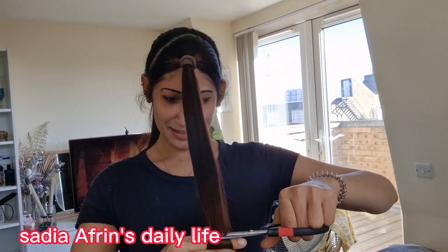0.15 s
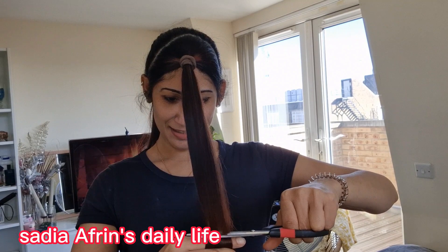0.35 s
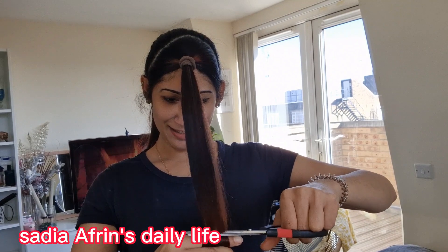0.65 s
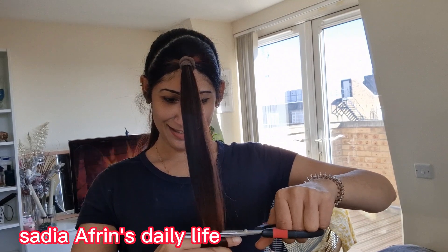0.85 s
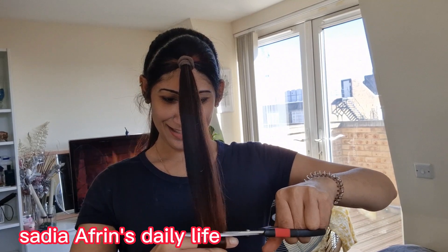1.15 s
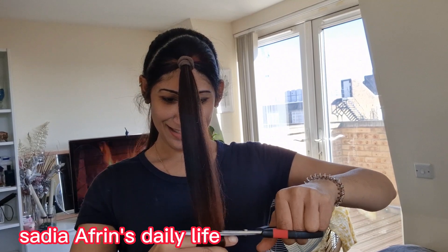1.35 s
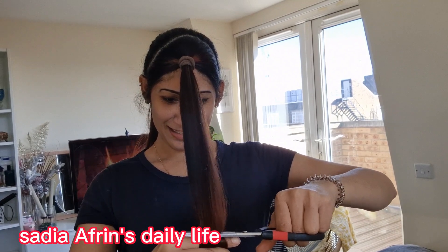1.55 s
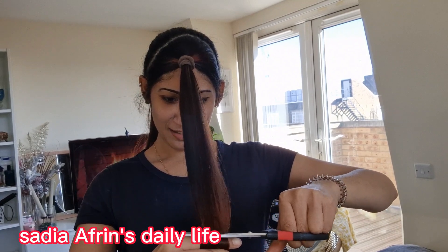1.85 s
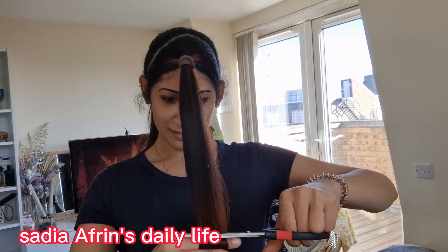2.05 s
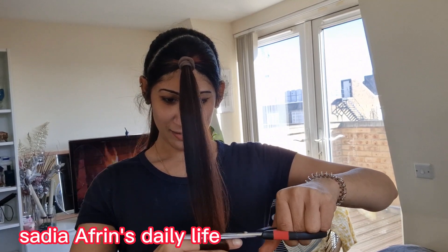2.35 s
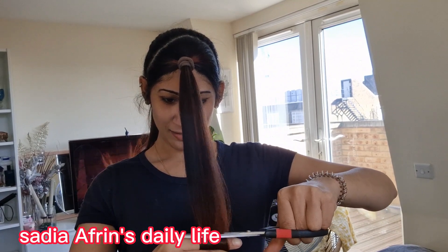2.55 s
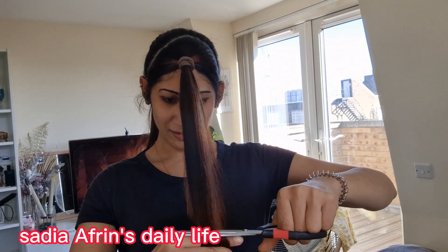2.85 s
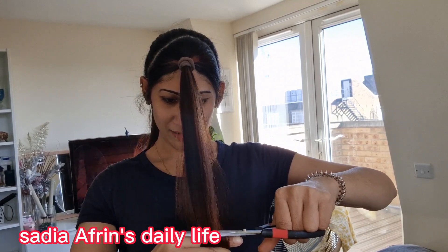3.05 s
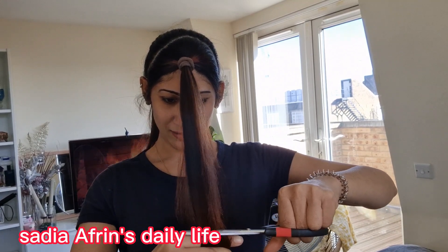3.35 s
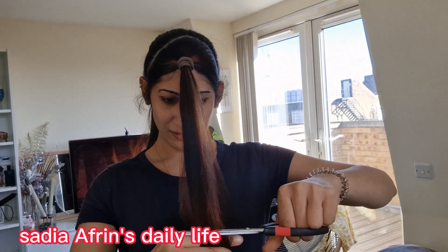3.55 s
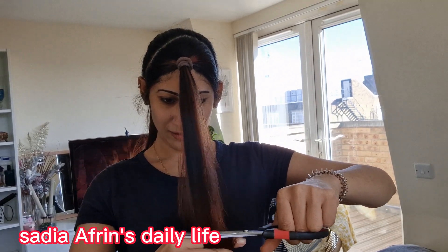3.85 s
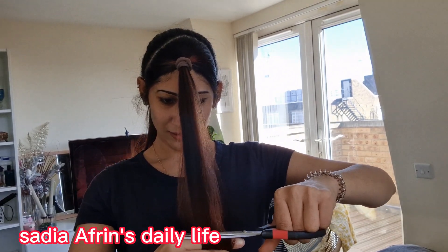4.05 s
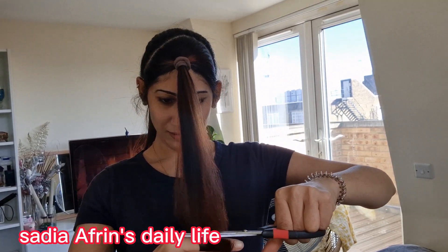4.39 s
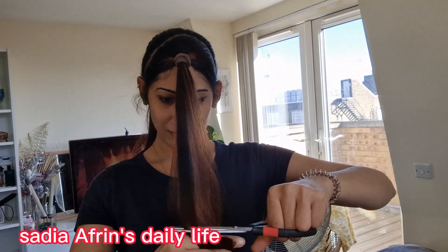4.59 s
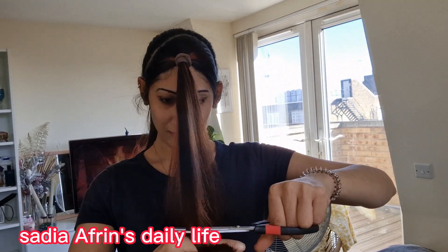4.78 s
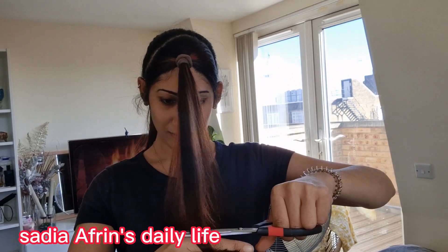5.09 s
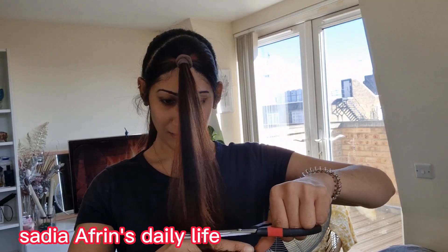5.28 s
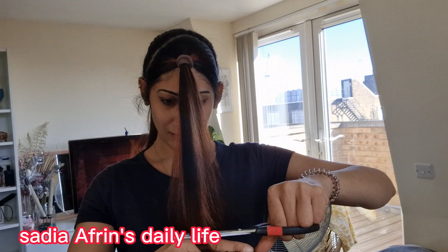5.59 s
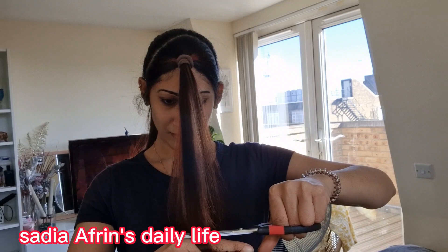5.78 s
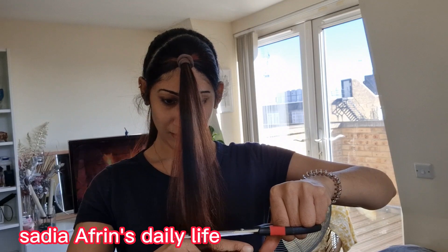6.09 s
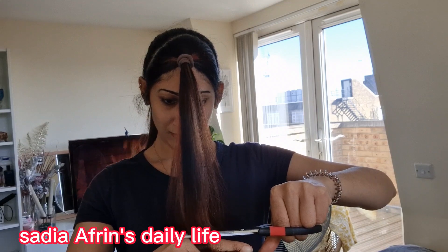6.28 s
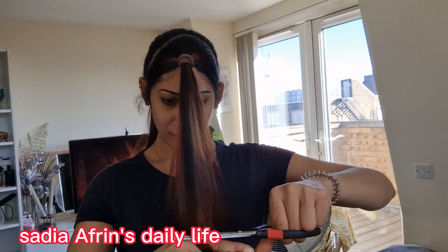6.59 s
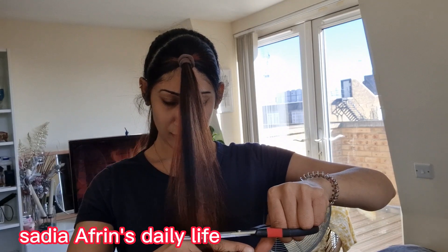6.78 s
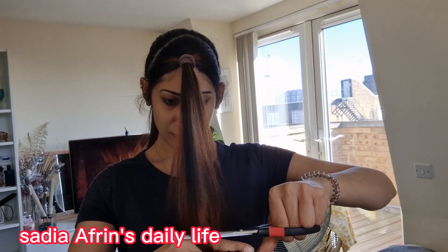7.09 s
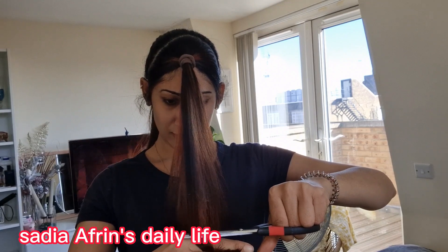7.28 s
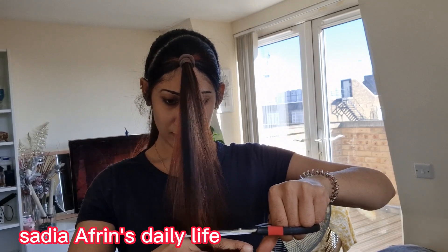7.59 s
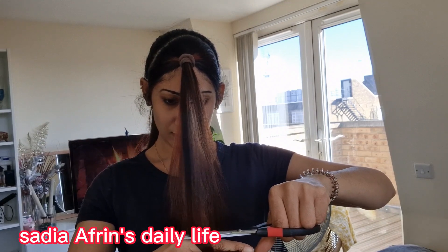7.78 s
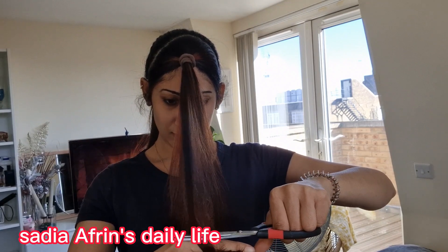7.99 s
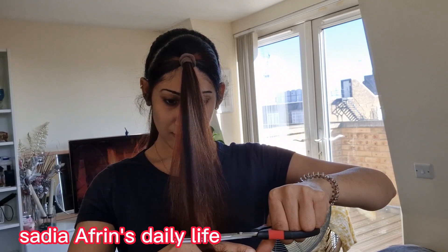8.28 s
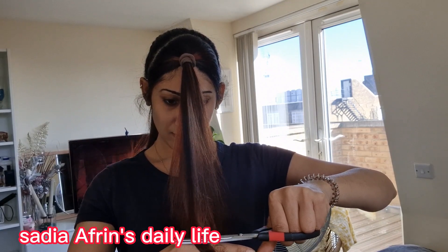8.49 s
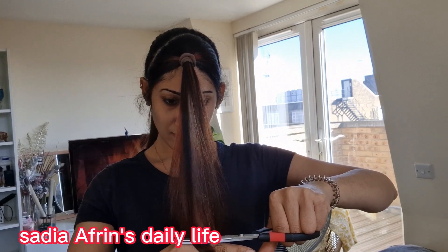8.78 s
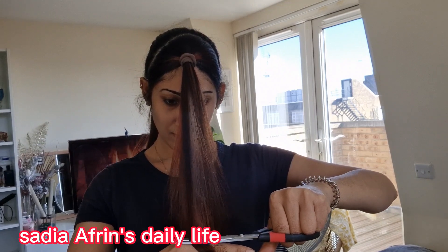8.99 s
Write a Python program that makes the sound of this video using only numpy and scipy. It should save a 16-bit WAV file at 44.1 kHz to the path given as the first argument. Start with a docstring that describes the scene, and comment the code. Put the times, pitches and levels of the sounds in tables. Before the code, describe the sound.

A quiet living room with a low swelling mains hum, rumble and thin hiss. Near the stereo microphone, scissors crunch through thick hair: six brisk strokes, each gritty and bright with a small steel ring, and soft metallic sliding as the blades part. After a pause come three slower squeezes, where small bunches of hair pop and crackle separately. A faint hand bump sounds early on.

```python
"""Scissors cut a thick lock of hair close to a phone in a quiet room with hum, rumble and hiss throughout.
First six quick crunchy strokes, the blades sliding softly open in between; then three slow, crackling bites.
Each severed hair is a tiny noise burst that rings the steel blades; thick bundles snap in longer bursts.
Two soft hand bumps are decaying sines. The room adds quick reflections and a short tail."""
import sys
import numpy as np
from scipy import signal
from scipy.fft import rfft, irfft
from scipy.io import wavfile

SR = 44100
rng = np.random.default_rng(int(sys.argv[2]) if len(sys.argv) > 2 else 0)


def file_out(sig):
    """Save sig as 16-bit WAV at sys.argv[1]."""
    # one column per channel
    cols = np.atleast_2d(sig).T
    # limit, then scale
    lim = np.clip(cols, -1, 1)
    pcm = np.round(lim * 32767).astype(np.int16)
    wavfile.write(sys.argv[1], SR, pcm)


N = 403074

# room tone, spectral shapes: (freq_hz, relative_density_db)
RUMBLE_SHAPE = [(12, -53), (20, -2.5), (53, -0.5), (75, -9.5), (102, -4.5), (115, -7), (125, -12.5),
                (151, -11), (202, -10.5), (236, -17), (452, -26), (1200, -38.5), (1560, -61), (2640, -120)]
HISS_SHAPE = [(600, -14.5), (1100, -4.5), (2300, -8), (4600, -10), (5800, -12), (6700, -6.5), (7500, -11),
              (8300, -16), (9900, -14), (11000, -19.5), (15500, -16)]
# room tone at the two ports: (freq_hz, left_right_correlation)
AIR_CORRELATION = [(40, 0.65), (200, 0.68), (400, 0.12), (900, 0.093), (3000, 0.018)]
# room tone: (freq_hz, left_minus_right_db)
AIR_BALANCE = [(100, 1.5), (3000, 1.5), (4500, 4.5), (5400, 5), (5900, 0), (6500, 9.5), (7700, 11),
               (8800, 3), (9600, -3), (11000, -1), (15000, 3)]
RUMBLE_RMS_DB, HISS_RMS_DB = -49, -68  # of the left-right mean; the rumble drifts around its level

# hum partials: (multiple_of_fundamental, centre_db)
HUM_PARTIALS = [(2, -56.5), (3.24, -63.5), (4, -62.5), (8, -79.5)]
# swells of the hum fundamental, before HUM_TRIM_DB: (peak_time_s, time_to_1_over_e_s, level_db)
HUM_SWELLS = [(2.3, 0.48, -39.5), (4.2, 0.5, -45), (7.05, 0.54, -42), (8.844, 0.25, -44)]
MAINS_HZ = 49.57
HUM_FLOOR_DB, HUM_TRIM_DB = -62, -2  # fundamental between swells; trim of floor and swells

# hand bumps: (start_s, envelope_peak_db, pitch_hz)
HAND_BUMPS = [(0.784, -43, 228), (2.862, -62, 704)]

# blades parting: (fastest_s, drive_db)
OPENINGS = [(0.035, -65), (0.84, -62.5), (1.54, -57.5), (2.23, -62), (2.93, -65), (3.89, -61.5)]
OPENING_HALF_S = 0.044  # to 1/e, either side

# quick strokes; the two offsets add to the body and tip settings:
# (start_s, length_s, rise_s, grip_drive_db, end_drive_db, body_offset_db, rasp_offset_db)
QUICK_STROKES = [ (0.284, 0.041, 0.004, -59.5, -56.5, -1, -10), (0.329, 0.25, 0.0063, -48, -53.5, -1.5, -6),
                 (1.094, 0.19, 0.039, -48.5, -41.5, -3.5, -3), (1.781, 0.16, 0.091, -41.5, -42, -7.5, 0),
                 (2.479, 0.18, 0.077, -40.5, -42.5, -6.5, -0.5), (3.158, 0.23, 0.086, -42, -48, -5.5, 0),
                 (4.176, 0.27, 0.04, -54.5, -41.5, -4, -1), ]
# pushes of the slow bites: (start_s, length_s, rise_s, grip_drive_db, end_drive_db, treble_gain_db)
SLOW_PUSHES = [ (5.645, 0.066, 0.022, -56, -53.5, -3), (5.754, 0.3, 0.004, -52.5, -59, -3),
               (6.072, 0.24, 0.01, -65.5, -61, -2), (7.02, 0.15, 0.044, -51, -57, 1.5),
               (7.172, 0.06, 0.005, -59, -57.5, 0), (7.266, 0.2, 0.03, -77.5, -63.5, -1),
               (7.496, 0.084, 0.024, -54.5, -57, -0.5), (8.463, 0.11, 0.0057, -66, -63.5, 2),
               (8.586, 0.25, 0.025, -54, -56.5, 1.5), (8.895, 0.027, 0.0092, -59, -58.5, 3.5),
               (8.968, 0.15, 0.005, -65.5, -53, 3.5), ]
# thick bundles giving way, before the bundle trim: (start_s, drive_peak_db)
BUNDLE_SNAPS = [(0.292, -49), (0.3357, -39.5), (0.4202, -36), (0.5541, -37), (1.109, -42), (1.809, -42.5),
                (1.953, -23), (2.5006, -50), (2.648, -32), (4.24, -31.5), (5.658, -43.5), (5.7669, -34),
                (5.8054, -36.5), (5.9879, -38), (6.028, -36.5), (6.1474, -43), (7.0554, -33),
                (7.0738, -35.5), (7.1764, -35.5), (7.217, -38), (7.3956, -47), (7.509, -44), (7.559, -35),
                (7.5907, -38), (8.467, -42), (8.5946, -36), (8.6364, -28.5), (8.6836, -30.5),
                (8.7165, -27.5), (8.737, -30), (8.776, -37.5), (8.802, -32), (8.9767, -37), (9.0473, -39)]
RELEASE_DB_PER_S = 350  # the crunch dies as the blades leave the hair
RUN_OUT_S = 0.045  # full crunch end to blades shut
BODY_ARCH_DB, BODY_SKEW = 4.5, 1.15  # body thinner at both ends of a cut, fullest past its middle
TIP_HZ, TIP_WIDTH_HZ = 3550, 2100  # this band grows from pivot to tips
# band gain, before the rasp offset: (pivot_db, tips_db)
TIP_GAIN_DB = (-6, 3)
BRIGHT_HZ = 9200  # the treble of a push lies above this
SMALL_PER_S, SMALL_DB, SMALL_SPREAD_DB = 25, 6.5, 4  # lesser bundles: rate, mean peak over force, spread

# broad colour of each kind of blade work: (freq_hz, gain_db)
CUT_COLOUR = [(300, -13.5), (600, -13), (900, -19), (1400, -12), (2150, -3), (2600, -18), (3300, 1.5),
              (4450, 1.5), (4850, -13.5), (5300, -3.5), (6500, -1.5), (7300, -2.5), (8200, -2.5),
              (9500, -4.5), (13000, -4), (15000, -8.5)]
BITE_COLOUR = [(1300, -22.5), (2150, -5), (2750, -17.5), (3450, 1), (4450, 1), (4950, -6.5), (5450, 3),
               (6200, -10), (7400, 1.5), (8350, -7.5), (10150, 0), (11000, -10), (11800, -4), (15000, -4)]
SLIDE_COLOUR = [(700, -8.5), (2000, -8.5), (2900, -14), (4000, -4.5), (4900, -3), (5700, 0.5), (6200, -11),
                (7400, -2.5), (8300, -5.5), (11000, -13.5), (12000, -7), (15000, -15)]
# steel resonances: (freq_hz, width_hz, relative_peak_db)
BLADE_MODES = [(2247, 37, 7.5), (3550, 190, -2), (4030, 28, -14), (5580, 52, 5), (5840, 43, -3),
               (6340, 37, -4), (6720, 130, 3), (6850, 40, 5), (7240, 210, 1), (7470, 42, 4.5),
               (7760, 55, 1.5), (8830, 45, 1.5), (9160, 310, 0.5), (11700, 74, 1)]

# the two microphone ports, for the scissors: (freq_hz, left_minus_right_db)
PORT_BALANCE = [(1000, 4), (3100, 4), (3700, 6.5), (4400, 7), (5000, 25), (5500, 1), (6200, 3), (7400, 5.5),
                (8600, 11.5), (9700, -2.5), (11600, 9.5), (13500, 7), (14800, 7), (15400, 15)]
# direct sound at the ports: (freq_hz, left_lead_rad)
PORT_PHASE = [(2900, 0.5), (3800, 1), (4500, 2.5), (4900, 3), (5600, 2.7), (6500, 1), (7500, 0.8),
              (9000, 3.5), (10000, 1.5), (14000, 2)]
# room tail: (freq_hz, decay_60db_s)
ROOM_T60 = [(500, 0.35), (3000, 0.14), (8000, 0.14), (15000, 0.17)]
EDGE_HZ = 15580  # top of the sound's band


def from_db(db):
    """Decibels to amplitude gain."""
    return 10 ** (np.asarray(db) / 20)


def unit(x):
    """Scale to rms 1."""
    return x / np.sqrt(np.mean(x ** 2) + 1e-20)


def read(points, hz):
    """Straight lines on a log-frequency axis."""
    f, value = np.transpose(points)
    return np.interp(np.log(hz + 1), np.log(f + 1), value)


def ports(balance_db):
    """Left and right gains of constant total power."""
    gains = from_db([balance_db / 2, -balance_db / 2])
    return gains / np.sqrt(np.mean(gains ** 2, 0))


def wander(rate_hz):
    """Random drift of rms 1: noise under a Gaussian low-pass."""
    hz = np.fft.rfftfreq(N, 1 / SR)
    spectrum = rfft(rng.standard_normal(N))
    return unit(irfft(spectrum * np.exp(-(hz / rate_hz) ** 2), N))


def swell(peak_s, half_s, db):
    """Gain with a smooth Gaussian rise and fall around one moment."""
    return from_db(db) * np.exp(-((np.arange(N) / SR - peak_s) / half_s) ** 2)


def air(shape, rms_db):
    """Room noise, more alike at both ports in the bass than in the treble."""
    hz = np.fft.rfftfreq(N, 1 / SR)
    a, b = rfft(rng.standard_normal((2, N)))
    same = np.clip(read(AIR_CORRELATION, hz), -1, 1)
    pair = np.array([a, same * a + np.sqrt(1 - same ** 2) * b])
    noise = irfft(pair * ports(read(AIR_BALANCE, hz)) * from_db(read(shape, hz)), N)
    return from_db(rms_db) * noise / np.std(noise.mean(0))


def hum(waver_rad=0.46, partial_waver_rad=0.72, flutter_db=3.0, balance_db=1.4):
    """Mains hum of an appliance: a swelling fundamental under partials that waver in level and phase."""
    turn = 2 * np.pi * MAINS_HZ * np.arange(N) / SR
    level = from_db(HUM_FLOOR_DB) + sum(swell(*row) for row in HUM_SWELLS)
    base = from_db(HUM_TRIM_DB) * level * np.sin(turn + waver_rad * wander(2.5))
    upper = np.zeros(N)
    for multiple, db in HUM_PARTIALS:
        gain = from_db(db + flutter_db * wander(3.4))
        upper += gain * np.sin(multiple * turn + partial_waver_rad * wander(4.4))
    return (base + upper) * ports(balance_db)[:, None]


def hand_bumps(peak_after_s=0.0048):
    """Soft bumps of the hands: short sines under an envelope that rises and decays."""
    t = np.arange(N) / SR
    sound = np.zeros(N)
    for start_s, db, hz in HAND_BUMPS:
        age_s = np.maximum(t - start_s, 0)
        envelope = age_s / peak_after_s * np.exp(1 - age_s / peak_after_s)
        sound += from_db(db) * envelope * np.sin(2 * np.pi * hz * age_s)
    return sound


def squeeze(start_s, length_s, rise_s, grip_db, end_db):
    """Gain of one stroke: the blades grip, work through the lock as the force shifts, and run out of hair."""
    age_s = np.arange(round((length_s + .5) * SR)) / SR
    hold_db = np.interp(age_s, [rise_s, max(length_s, rise_s)], [grip_db, end_db])
    release_db = RELEASE_DB_PER_S * np.maximum(age_s - length_s, 0)
    gain = np.minimum(age_s / rise_s, 1) * from_db(hold_db - release_db)
    return np.pad(gain, (round(start_s * SR), N))[:N]


def crackle(per_s, spread_db, rub, burst_s, clump_db, clump_hz, size=300):
    """Hairs tear in tiny noise bursts, unequal in size and in clumps, over the rub of the edges."""
    sizes = from_db(spread_db * np.minimum(rng.exponential(1, N), 3.5))
    starts = sizes ** 2 * (rng.random(N) < per_s / SR)
    age = np.arange(size) / SR / burst_s
    power = np.convolve(starts, age * np.exp(-age))[:N]
    tearing = np.sqrt(power / power.mean() + rub ** 2) * rng.standard_normal(N)
    return unit(tearing * from_db(clump_db * wander(clump_hz)))


def blades(drive, colour, ring, size=4096):
    """Minimum-phase response: broad colour of the snap with narrow steel resonances on top."""
    hz = np.fft.rfftfreq(size, 1 / SR)
    peaks = sum(from_db(db) ** 2 / (1 + (2 * (hz - f) / width) ** 2) for f, width, db in BLADE_MODES)
    log_gain = np.log(from_db(read(colour, hz)) * np.sqrt(1 + ring ** 2 * peaks))
    circle = np.concatenate([log_gain, log_gain[-2:0:-1]])
    # the Hilbert transform of log gain gives the causal phase
    response = np.fft.ifft(np.exp(np.conj(signal.hilbert(circle)))).real
    return signal.oaconvolve(drive, response / np.linalg.norm(response))[:N]


def openings():
    """Steel slides on steel as the blades part: dense fine crackle with a strong rub."""
    force = sum(swell(s, OPENING_HALF_S, db) for s, db in OPENINGS)
    grain = crackle(per_s=900, spread_db=5.5, rub=0.59, burst_s=0.0001, clump_db=-0.5, clump_hz=120)
    return blades(force * grain, SLIDE_COLOUR, ring=1.06)


def slow_crackle(force):
    """Under slow pressure the hairs part in separate little bunches."""
    grain = crackle(per_s=520, spread_db=3.5, rub=0.18, burst_s=0.0003, clump_db=2.5, clump_hz=180)
    return blades(force * grain, BITE_COLOUR, ring=0.9)


def bundles(force, trim_db=-5, peak_after_s=0.00048, size=400):
    """A bundle gives way in a noise burst about a millisecond long; small ones go at random under the force."""
    small = from_db(SMALL_DB + SMALL_SPREAD_DB * rng.standard_normal(N))
    peaks = force * small * (rng.random(N) < SMALL_PER_S / SR)
    for start_s, db in BUNDLE_SNAPS:
        peaks[round(start_s * SR)] = from_db(db)
    age = np.arange(size) / SR / peak_after_s
    drive = np.convolve(peaks, age * np.exp(1 - age))[:N] * rng.standard_normal(N)
    return from_db(trim_db) * blades(drive, BITE_COLOUR, ring=1.0)


def slow_work():
    """Each slow push drives the crackle and small bundles, beside timed snaps, and sets the brightness."""
    force = sum(squeeze(*row[:-1]) for row in SLOW_PUSHES)
    sound = slow_crackle(force) + bundles(force)
    treble_db = np.zeros(N)
    for start_s, *_, db in SLOW_PUSHES:
        treble_db[round(start_s * SR):] = db
    high_pass = signal.butter(3, BRIGHT_HZ, "high", fs=SR, output="sos")
    treble = signal.sosfiltfilt(high_pass, sound)
    return sound + treble * (from_db(treble_db) - 1)


def quick_cuts(trim_db=1.0, body_db=5, body_hz=4200, fizz_hz=10300, fizz_share=0.18):
    """Dense crunch; gains body and fizz where the blades are deepest in the lock, and rasps towards the tips."""
    force, depth_db, tip_db = np.zeros((3, N))
    for start_s, length_s, rise_s, grip_db, end_db, body_offset_db, rasp_db in QUICK_STROKES:
        force += squeeze(start_s, length_s, rise_s, grip_db, end_db)
        at = round(start_s * SR)
        closed = np.minimum(np.arange(N - at) / SR / (length_s + RUN_OUT_S), 1)  # 0 open, 1 shut
        arch_db = BODY_ARCH_DB * (1 - np.sin(np.pi * closed ** BODY_SKEW))
        depth_db[at:] = body_db + body_offset_db - arch_db
        tip_db[at:] = rasp_db + np.interp(closed, [0, 1], TIP_GAIN_DB)
    grain = crackle(per_s=1600, spread_db=4.2, rub=0.28, burst_s=0.0002, clump_db=1.57, clump_hz=130)
    crunch = blades(force * grain, CUT_COLOUR, ring=2.06)
    tips = signal.lfilter(*signal.iirpeak(TIP_HZ, TIP_HZ / TIP_WIDTH_HZ, fs=SR), crunch)
    crunch = crunch + tips * (from_db(tip_db) - 1)
    low = signal.sosfiltfilt(signal.butter(3, body_hz, fs=SR, output="sos"), crunch)
    high = signal.sosfiltfilt(signal.butter(4, fizz_hz, "high", fs=SR, output="sos"), crunch)
    body = low * (from_db(depth_db) - 1)
    fizz = high * (from_db(fizz_share * depth_db) - 1)
    return from_db(trim_db) * (crunch + body + fizz)


def room(x, near_db=-0.5, near_s=0.0045, tail_db=-2, port_hz=15300, port_width_hz=350, port_db=6, size=16384):
    """Direct sound, quick reflections from hands and chest, and a short tail, heard at two ports."""
    t, hz = np.arange(size) / SR, np.fft.rfftfreq(size, 1 / SR)
    lead = 64  # samples kept ahead of the direct sound for the phase-advanced port
    direct = np.exp(1j * np.array([[.5], [-.5]]) * read(PORT_PHASE, hz))
    near = rng.standard_normal((2, size)) * np.exp(-t / near_s)
    late_noise = rng.standard_normal((2, size)) * (t > .005)
    f, age_s, z = signal.stft(late_noise, SR, nperseg=256)
    decay = from_db(-60 * age_s / read(ROOM_T60, f)[:, None])
    tail = signal.istft(z * decay, SR, nperseg=256)[1][:, :size]
    echoes = (from_db(near_db) * unit(near) + from_db(tail_db) * unit(tail)) / np.sqrt(size)
    cavity = from_db(port_db / (1 + ((hz - port_hz) / port_width_hz) ** 2))  # the ports resonate at the very top
    response = irfft((direct + rfft(echoes)) * ports(read(PORT_BALANCE, hz)) * cavity)
    response = np.roll(response, lead, axis=1)
    return signal.oaconvolve(x[None], response, axes=1)[:, lead:lead + N]


def scene(drift_db=0.5):
    """The scissors in the room, over hum, slowly drifting rumble and steady hiss."""
    rumble = from_db(drift_db * wander(0.96)) * air(RUMBLE_SHAPE, RUMBLE_RMS_DB)
    background = rumble + air(HISS_SHAPE, HISS_RMS_DB) + hum()
    # the hands shift between quick and slow work, so each has its own reflections
    scissors = room(quick_cuts() + openings()) + room(slow_work())
    return background + hand_bumps() + scissors


def record(dry):
    """Band limit: a linear-phase low-pass leaves nothing above the edge."""
    low_pass = signal.firwin(801, EDGE_HZ, window=("kaiser", 8), fs=SR)
    return signal.oaconvolve(dry, low_pass[None], "same", axes=1)


dry = scene()
out = record(dry)
file_out(out)
```